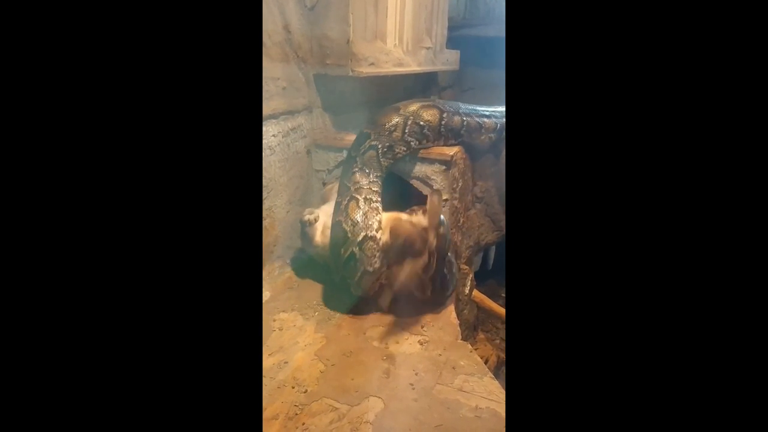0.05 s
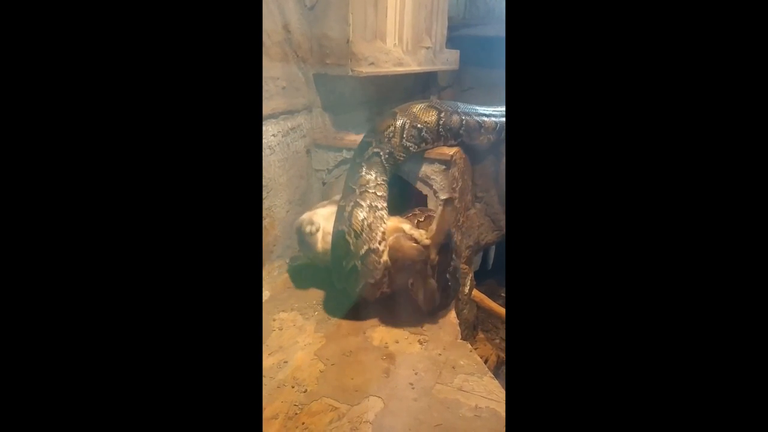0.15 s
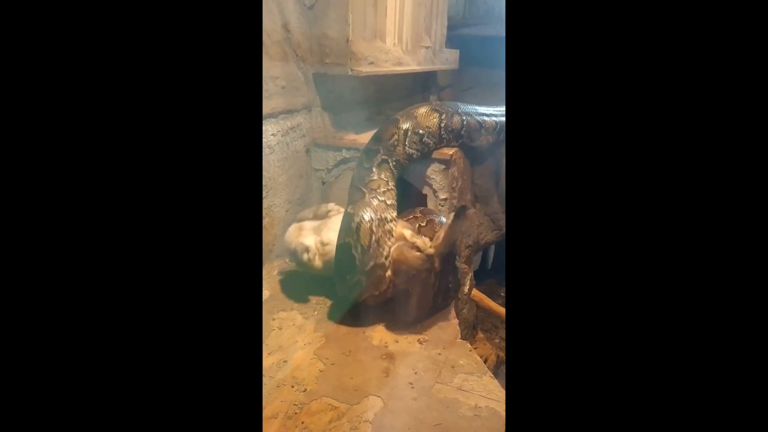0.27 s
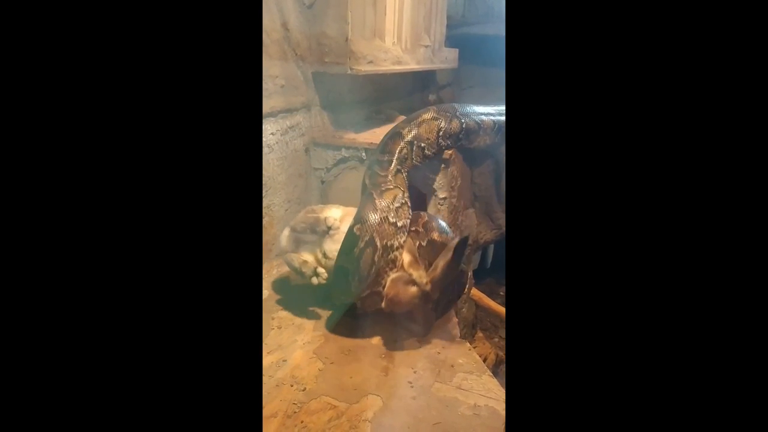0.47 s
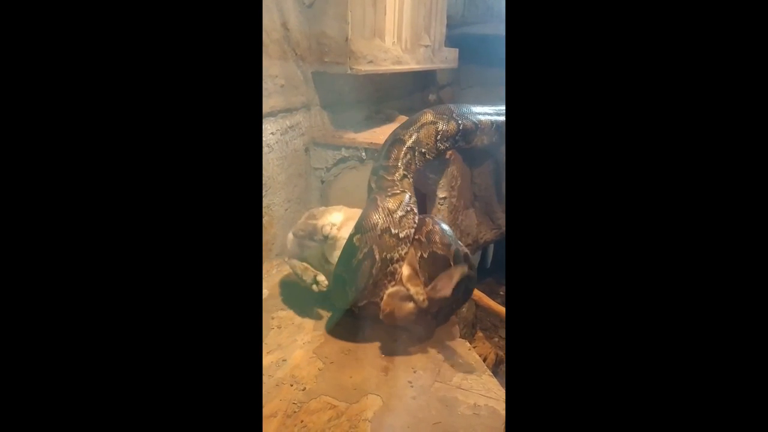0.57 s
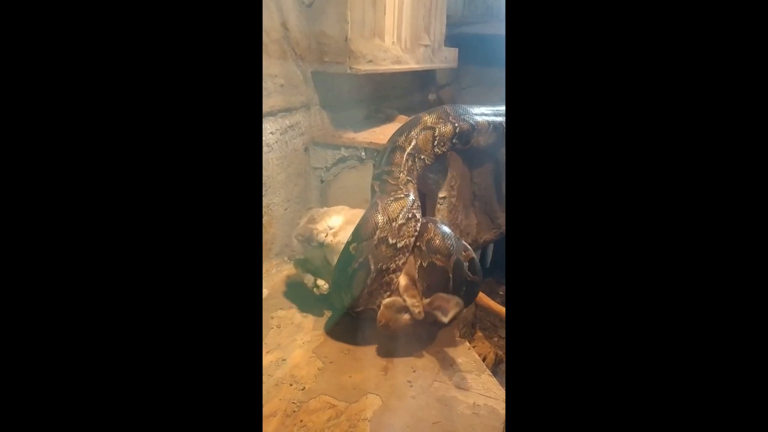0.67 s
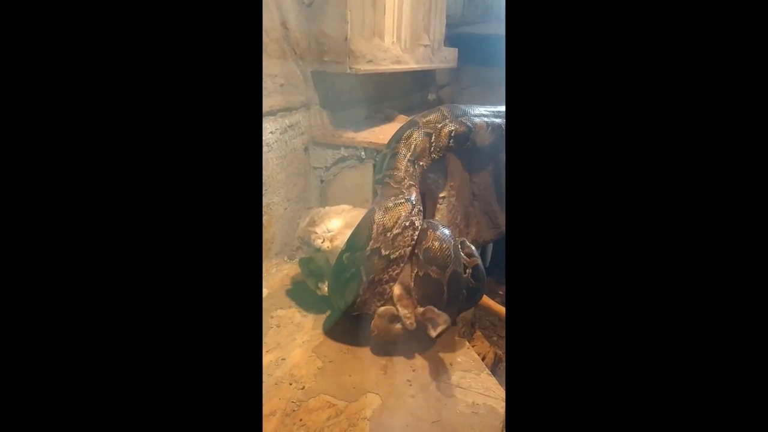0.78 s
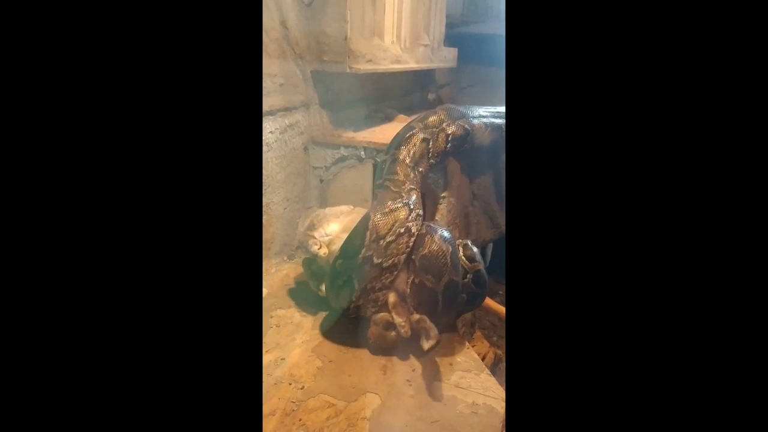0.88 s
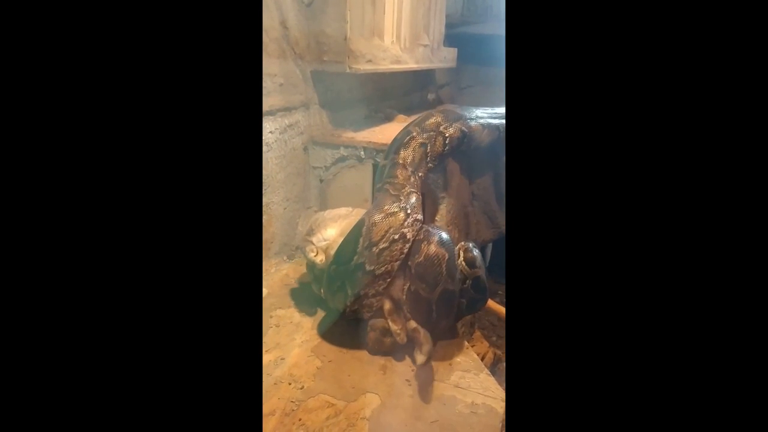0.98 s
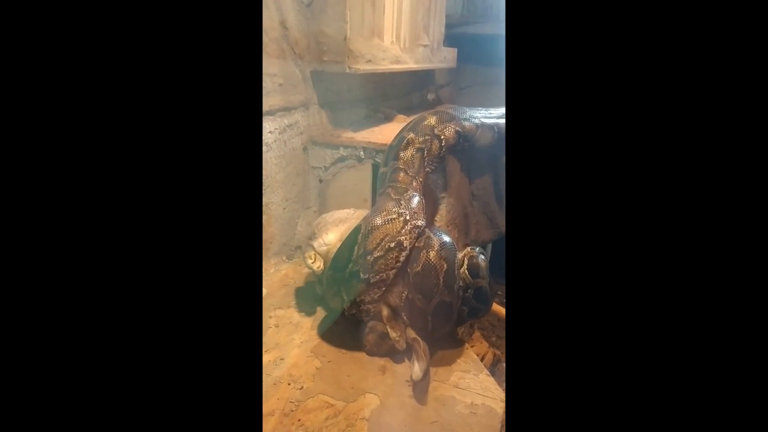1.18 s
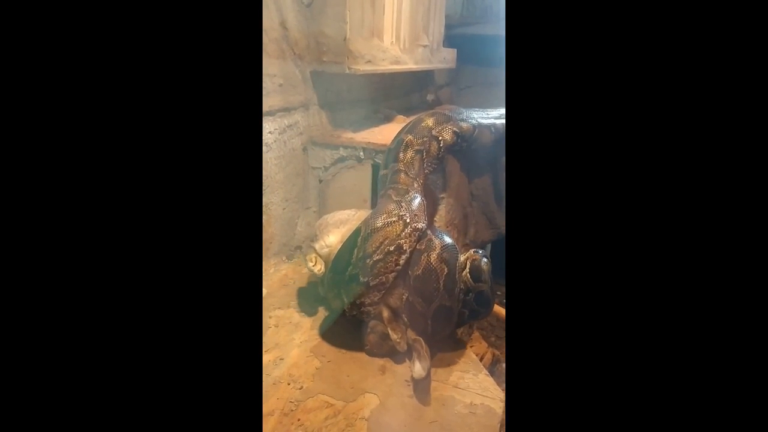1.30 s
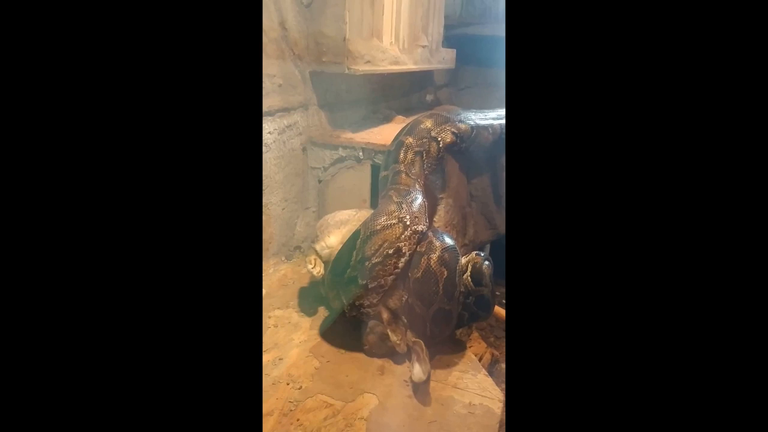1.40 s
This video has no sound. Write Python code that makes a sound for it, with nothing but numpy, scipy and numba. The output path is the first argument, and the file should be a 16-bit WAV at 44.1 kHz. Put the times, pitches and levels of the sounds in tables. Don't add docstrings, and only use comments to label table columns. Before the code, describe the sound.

Close up in a small glass-walled enclosure, a rabbit screams loudly twice and begins a third cry, shrill and cracking, with a heavy then lighter floor thump under the second and faint low room hum.

```python
import sys
import numpy as np
from scipy import signal
from scipy.fft import rfft, irfft, next_fast_len
from scipy.io import wavfile
from scipy.ndimage import uniform_filter1d, minimum_filter1d
from numba import njit

SR = 44100
rng = np.random.default_rng(int(sys.argv[2]) if len(sys.argv) > 2 else 0)


def how_loud(loudness_db):
    steps = np.asarray(loudness_db, float) / 20
    return 10 ** steps


def digitize_waveform(pressure):
    field = np.atleast_2d(pressure).T
    bounded = np.clip(field, -1, 1)
    quanta = np.round(bounded * 32767).astype(np.int16)
    wavfile.write(sys.argv[1], SR, quanta)


N = 63945
T = np.arange(N) / SR


def level(x, db):
    return x * how_loud(db) / np.sqrt(np.mean(x ** 2))


def walk(rate):
    k = int(SR / rate)
    smooth = uniform_filter1d(uniform_filter1d(rng.standard_normal(N), k), k)
    return level(smooth, 0)


def ring(x, hz, width):
    return signal.lfilter(*signal.iirpeak(hz, hz / width, fs=SR), x)


def gate(t0, t1, edge):
    return np.clip((T - t0) / edge, 0, 1) * np.clip((t1 - T) / edge, 0, 1)


def swell(start, rise, hold, fall):
    return np.clip(np.minimum((T - start) / rise, 1 - (T - start - rise - hold) / fall), 0, 1)


def shape(x, table):
    f, v = np.array(table, float).T
    n = next_fast_len(N + 4096)
    mirror = x[..., :-2048:-1] * np.linspace(1, 0, num=2047)
    x = np.concatenate([x, mirror], axis=-1)
    bins_hz = np.arange(n // 2 + 1) * SR / n
    gain = how_loud(np.interp(np.log(bins_hz + 1), np.log(f), v))
    return irfft(rfft(x, n) * gain, n)[..., :N]


def turn_phase(x, rad):
    return (signal.hilbert(np.r_[x, x[::-1]])[:N] * np.exp(1j * rad)).real


def hum():
    # frequency in Hz, level in dB.
    rumble_colour = [(15, -51.5), (25, -20), (54, -2), (198, -10.5), (260, 1), (352, -14.5), (438, -7.5),
                     (518, -17.5), (1400, -24), (1820, -34), (3080, -120)]
    # time in seconds, level in dB.
    rumble_swell = [(0, -9), (.15, 4), (.35, -1), (.6, -12), (.8, -2.5), (1.1, 12.5), (1.45, -5)]
    mid, side = (shape(rng.standard_normal(N), rumble_colour + [(2000, -72.5)]) for _ in range(2))
    flicker_db = 2.3 * walk(6.0) + np.interp(T, *np.array(rumble_swell).T)
    low = level(mid + 0.45 * side * np.array([[1], [-1]]), -63.5) * how_loud(flicker_db)
    hiss = shape(rng.standard_normal((2, N)),
                 [(800, -14), (2000, -11.5), (5000, -18.5), (9000, -18), (10500, -40.5)])
    air = rng.standard_normal(N) + 0.65 * rng.standard_normal((2, N))
    air = shape(air, [(9500, -11), (13500, 9), (15500, -1)])
    return low + level(hiss, -67.5) + level(air, -76) * how_loud(2.5 * walk(8.3))


def thumps():
    # start in seconds, knock level in dB, body level in dB.
    hits = [
        (1.024, -25, -26),
        (1.132, -41, -34.5),
    ]
    # frequency in Hz, level in dB, time to fade by 60 dB in seconds.
    panel = [(73, -0.5, 0.089), (154, 9.5, 0.04), (162, -13, 1), (252.4, -9, 0.52), (403, -12, 0.18)]
    knock_hz, knock_fade_s = 828, 0.029
    push_delay_s, push_rise_s = 0.0035, 0.0036
    rattle_db, rattle_fade_s = -9.5, 0.47
    knock_colour = [(200, -20), (knock_hz / 2, 0), (1.6 * knock_hz, 0), (2 * knock_hz, -40)]
    bedding_colour = [(30, -15), (70, 6.5), (300, -20.5), (600, -21.5), (1500, -31.5)]
    out = 0
    for s, knock_db, body_db in hits:
        t = np.maximum(T - s, 0)
        late = np.maximum(T - s - push_delay_s, 0)
        grit = shape(rng.standard_normal((2, N)), knock_colour)
        knock = level(grit[0] + 0.5 * grit, 0)
        knock = knock * how_loud(knock_db - 60 * t / knock_fade_s) * np.minimum(t / 0.00092, 1)
        body = sum(how_loud(db - 60 * late / t60) * np.sin(2 * np.pi * hz * late) for hz, db, t60 in panel)
        rattle = level(shape(rng.standard_normal((2, N)), bedding_colour), rattle_db)
        rattle = rattle * how_loud(-60 * late / rattle_fade_s) * np.minimum(late / push_rise_s, 1)
        out = out + knock + how_loud(body_db) * (body + rattle)
    return shape(out, [(30, -29.0), (70, -2.0), (1400, 1.5), (2000, -46.0)])


def rush():
    # start, rise, hold and fall in seconds, level in dB.
    puffs = [
        (0.746, 0.013, 0.017, 0.021, -37.5),
        (1.379, 0.027, .08, .03, -39),
    ]
    # frequency in Hz, level in dB.
    breath_colour = [(700, -24), (1100, -18.5), (1900, -6), (3100, 6.5), (4300, -2.5), (4900, -18),
                     (6500, -49), (9500, -77)]
    air = level(shape(rng.standard_normal((2, N)), breath_colour), 0) * how_loud(1.8 * walk(121))
    return air * sum(how_loud(db) * swell(s, rise, hold, fall) for s, rise, hold, fall, db in puffs)


@njit
def fire(stretch, size, hz):
    out, p, k = np.zeros(N + 1), 0., 0
    for i in range(N):
        step = hz * stretch[k] / SR
        p += step
        if p >= 1:
            p, k = p - 1, k + 1
            out[i] += size[k] * p / step
            out[i + 1] += size[k] * (1 - p / step)
    return out[:-1]


def rasp():
    # time in seconds, level in dB, brightness in dB per octave, weight of low throat in dB.
    bursts = [
        [(0, -60, -9, 5), (.03, -69, 10, 20.5), (.07, -79, -14, 15.5), (.11, -63.5, -19.5, 2)],
        [(.2, -59.5, 19, -4), (.23, -46, 12.5, -10), (.27, -36.5, -10, -3), (.33, -33.5, -10, -2),
         (.4, -28, -13.5, -2.5), (.45, -35.5, -8.5, -1), (.48, -47.5, -27, -18.5), (.58, -56.5, -10.5, -5.5)],
        [(.6, -67, 1, 5), (.62, -48, -6, 14), (.66, -69, -8, 22), (.72, -87.5, -2.5, 13)],
        [(.747, -57, -9.5, 4.5), (.765, -52, 1.5, 6.5), (.8, -43, 5, 1.5), (.822, -38, -5.5, 6),
         (.865, -33.5, -8.5, -5.5), (.95, -32, -6, -3), (1.05, -32, 1.5, -4), (1.15, -36, 5, 1),
         (1.23, -46.5, -7.5, 11.5)],
        [(1.385, -55, -22, -6), (1.398, -54.5, -12, -2), (1.415, -50.5, -15, 0.5), (1.45, -53, -18.5, -4)],
    ]
    # centre in Hz, width in Hz, level in dB.
    throat = [(1762, 275, -17), (2228, 71, -11), (2582, 152, -8), (2797, 41, -4.5), (3035, 143, -5.5),
              (3525, 130, -12.5), (4020, 60, -14), (4522, 237, -19), (5203, 170, -16), (5676, 91, -16),
              (6114, 200, -16.5), (7650, 440, -37), (8376, 350, -26.5), (9600, 130, -49.5)]
    pulse_hz, jitter, scatter_db = 2511., 0.41, 3.5
    chance = rng.standard_normal((N // 5, 2)).T
    pulses = fire(np.exp(jitter * chance[0]), how_loud(scatter_db * chance[1]), pulse_hz)
    pulses = level(pulses - pulses.mean(), 0) * how_loud(1.8 * walk(110))
    strands = [3.0 * walk(38) for _ in throat]
    out = 0
    for rows in bursts:
        s, db, tilt, low_db = np.array(rows, float).T
        drive = pulses * how_loud(np.interp(T, s, db)) * gate(s[0], s[-1] + 0.0087, 0.0031)
        for k, (hz, width, peak_db) in enumerate(throat):
            if hz < 2400:
                colour_db = np.interp(T, s, low_db) * (2250 / hz) ** 2
            else:
                colour_db = np.interp(T, s, tilt) * min(np.log2(hz / 3400), 0.6)
            rung = ring(ring(drive * how_loud(colour_db + strands[k]), hz, 4 * width), hz, width)
            out = out + (-1) ** k * how_loud(peak_db + 28.5) * rung
    return out


def notes():
    # time in seconds, pitch in Hz, level in dB.
    rise = [(0, 2035, -50.5), (.04, 2185, -45.5), (.065, 2184, -33.5), (.105, 2275, -37.5),
            (.13, 2211, -28.5), (.15, 2280, -32.5), (.185, 2293, -25), (.21, 2352, -28.5),
            (.24, 2370, -41.5)]
    peak = [(0.197, 2433, -35), (0.224, 2636, -21.5), (0.257, 2613, -15.5), (0.288, 2660, -17),
            (.33, 2691, -26.5), (0.369, 2646, -12.5), (0.385, 2642, -32.5), (0.4, 2724, -21.5),
            (0.463, 2645, -23.5)]
    sag = [(0.442, 2295, -27), (0.456, 2255, -29), (0.481, 2205, -26), (0.54, 2180, -28),
           (0.585, 2165, -24), (.603, 2140, -34)]
    catch = [(0.762, 2873, -36.5), (0.775, 3030, -35), (0.789, 3054, -28), (0.792, 3020, -39.5)]
    crack_up = [(0.792, 4256, -33), (0.798, 4158, -37), (0.815, 4256, -31), (0.824, 4325, -29),
                (0.83, 4420, -45)]
    hold = [(0.859, 3026, -42.5), (0.912, 3034, -25.5), (0.941, 3004, -27), (.982, 3035, -12.5),
            (.998, 3023, -26), (1.009, 3030, -39), (1.039, 3085, -16.5), (1.058, 3019, -25.5),
            (1.099, 3012, -18)]
    squeal = [(0.385, 5160, -50), (0.415, 5190, -39), (0.443, 5170, -41)]
    groan = [(0.83, 2350, -33.5), (0.871, 2363, -27.5), (0.919, 2371, -32)]
    fade = [(1.108, 2997, -32), (1.117, 3020, -21), (1.157, 2992, -20.5), (1.169, 3027, -33),
            (1.184, 3045, -28.5), (1.212, 3042, -29.5), (1.248, 3040, -34.5), (1.265, 2910, -44.5)]
    strain = [(0.789, 3250, -41.5), (.797, 3290, -20.5), (0.81, 3330, -35.5), (.83, 3030, -35.5)]
    side_low = [(0.249, 3100, -49), (.3, 3158, -41), (.36, 3114, -34.5), (.39, 3090, -41),
                (.44, 3140, -27.5), (0.471, 3180, -36)]
    side_high = [(0.244, 3460, -45.5), (.28, 3436, -37.5), (.32, 3490, -44), (.36, 3490, -40),
                 (.41, 3470, -30.5), (0.449, 3420, -33)]
    split_tone = [(0.871, 2526, -39.5), (.94, 2526, -23.5), (0.966, 2540, -31.5)]
    under = [(1.15, 2925, -34), (1.191, 2922, -22.5), (1.244, 2917, -44)]
    croak = [(.608, 1963, -38), (.617, 1891, -30), (.645, 1883, -42), (.69, 1872, -53)]
    dying = [(0.605, 2135, -39), (.62, 2110, -32.5), (.66, 2124, -47.5), (0.741, 2118, -67)]
    # which overtone the pitch names, pitch tremble as a share, level tremble in dB.
    tremble = [(1, 0.0044, 3.5), (1, 0.0026, 2.12), (1, 0.0037, 1.97), (2, 0.0091, 1.5), (2, 0.0057, 3.5),
               (1, 0.0051, 3), (1, 0.0067, 5), (1, 0.0044, 2.5), (1, 0.00775, 3), (1, 0.047, 0),
               (1, .004, 2.2), (1, 0.0033, 5), (1, 0.0046, -2.5), (1, 0.0043, 1.5), (1, 0.0497, 6.5),
               (1, .006, 2)]
    overtones_db = [(1.5, -12.5, -28.5, -32.5), (5,), (3.5, -5, -26.5, -16), (1, 5, -2, -12.5),
                    (0, 7, -12.5, -28.5), (3,), (11.5,), (3.5,), (1.9,), (1.3,), (-4,), (2,), (7,), (2.8,),
                    (1, -6), (-0.9, -2.5, -7, -18)]
    # peak time, rise and fall in seconds, pitch scatter and pull as shares.
    slips = [
        (0.227, 0.05, 0.0097, 0.025, 0.012),
        (0.612, 0.012, 0.15, .01, -.004),
    ]
    edge_s = 0.004
    scatter, pull = 0, 1
    for s, up_s, down_s, share, drag in slips:
        bump = np.clip(np.minimum(1 + (T - s) / up_s, 1 - (T - s) / down_s), 0, 1)
        scatter, pull = scatter + share * bump, pull + drag * bump
    sung = (rise, peak, sag, catch, crack_up, hold, squeal, groan, fade,
            strain, side_low, side_high, split_tone, under, croak, dying)
    out = 0
    for rows, (k, jitter, shimmer_db), parts in zip(sung, tremble, overtones_db):
        s, hz, db = np.array(rows, float).T
        shake = pull + jitter * walk(489) + scatter * walk(740)
        phase = 2 * np.pi * np.cumsum(np.interp(T, s, hz) / round(k) * shake) / SR
        stack = sum(how_loud(p + shimmer_db * walk(160)) * np.sin((j + 1) * phase) for j, p in enumerate(parts))
        loudness = np.sqrt(2) * how_loud(np.interp(T, s, db))
        out = out + loudness * gate(s[0] - edge_s, s[-1] + edge_s, edge_s) * stack
    return out


def box_echo(clean, rough):
    fade_s, gap_s = 0.23, 0.0033
    t = T[:SR // 3]
    echo = rng.standard_normal((2, len(t))) * how_loud(-60 * t / fade_s) * (t > gap_s)
    echo = echo / np.sqrt((echo ** 2).sum(axis=1, keepdims=True))
    walls = how_loud(-10) * clean + rough
    return signal.fftconvolve(walls[None], echo, axes=1)[:, :N]


def voice():
    # time in seconds, left minus right in dB.
    drift = [(1., 1.5), (1.16, -1)]
    # frequency in Hz, level in dB.
    voice_colour = [(1200, -31), (1550, -17.5), (1750, -18.5), (1950, -2), (9100, -4.5), (9500, -12),
                    (11000, -62.5)]
    clean, rough = notes(), rasp()
    throat_sound = clean + rough
    left = turn_phase(throat_sound, 1.05 + 0.45 * walk(10.0))
    direct = np.array([left, throat_sound])
    pan_db = np.interp(T, *np.array(drift).T) * np.array([[0.5], [-0.5]])
    return shape((direct + box_echo(clean, rough)) * how_loud(pan_db), voice_colour) + rush()


def scene():
    # frequency in Hz, level in dB.
    thud_shade = [(70, 0), (130, -6), (260, -2), (550, -9), (1300, -2)]
    # frequency in Hz, left minus right in dB.
    port_difference = [(60, 2), (200, 1.5), (600, 0), (1290, -1.5), (2380, 1.5), (4400, -0.5), (8120, 18),
                       (15000, 5)]
    cry, thud = voice(), thumps()
    left = cry[0] + shape(turn_phase(thud[0], 1.3), thud_shade)
    right = cry[1] + thud[1]
    left_gain = [(f, np.clip(db / 2, -3, 3)) for f, db in port_difference]
    right_gain = [(f, np.clip(db / 2, -3, 3) - db) for f, db in port_difference]
    return np.array([shape(left, left_gain), shape(right, right_gain)]) + hum()


def band_limit(x):
    return signal.sosfilt(signal.butter(12, 15760, fs=SR, output="sos"), x)


def record(dry):
    limit, window = 0.75, 201
    peak = np.abs(dry).max(axis=0) + 1e-9
    gain = minimum_filter1d(np.minimum(1, limit / peak), size=window)
    mix = dry * uniform_filter1d(gain, size=window)
    return band_limit(mix)


dry = scene()
out = record(dry)
digitize_waveform(out)
```